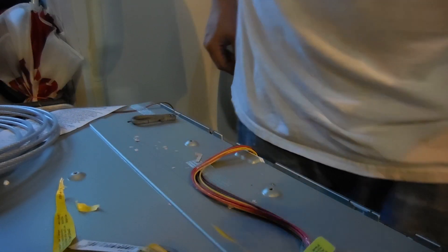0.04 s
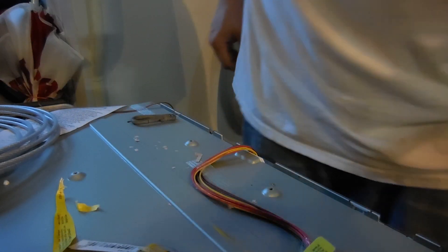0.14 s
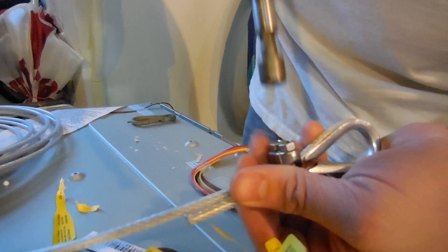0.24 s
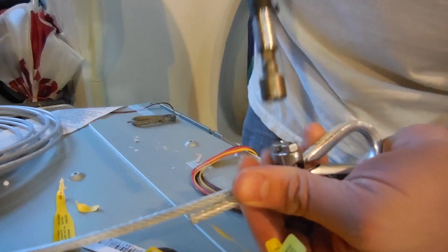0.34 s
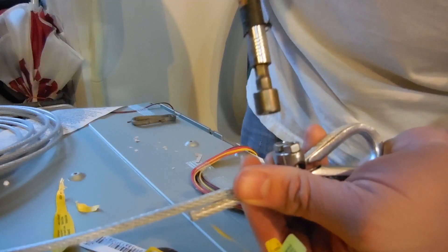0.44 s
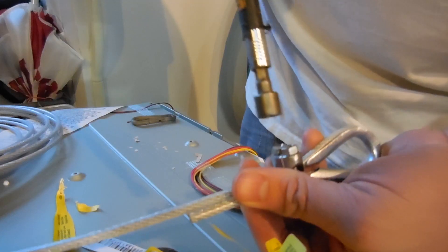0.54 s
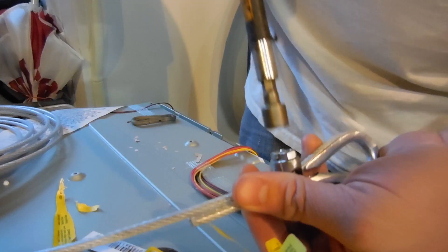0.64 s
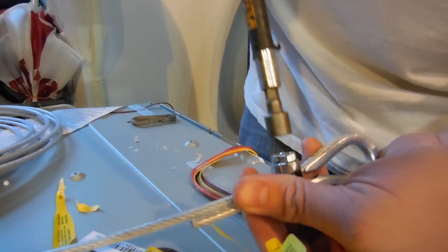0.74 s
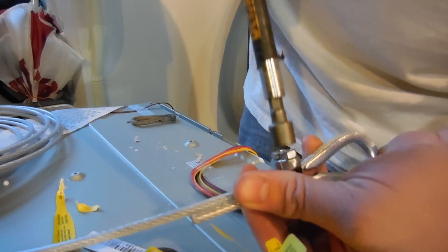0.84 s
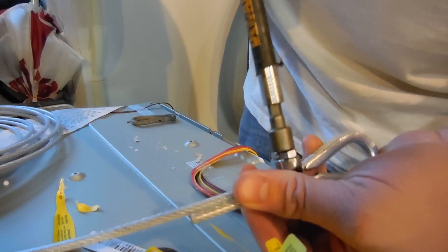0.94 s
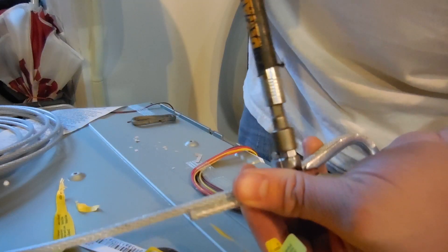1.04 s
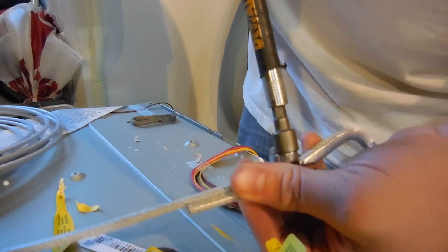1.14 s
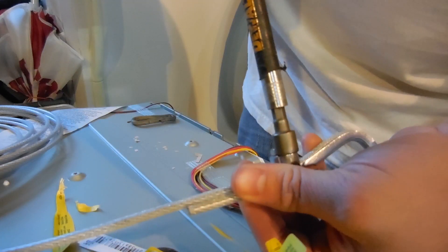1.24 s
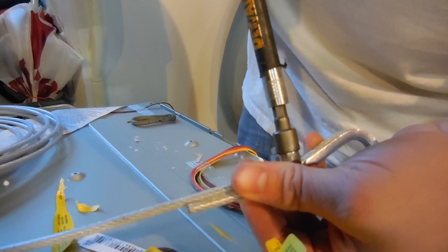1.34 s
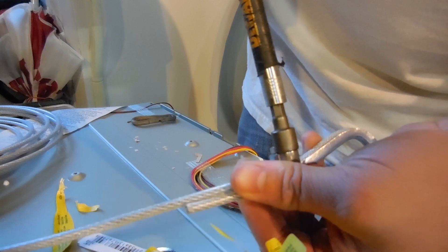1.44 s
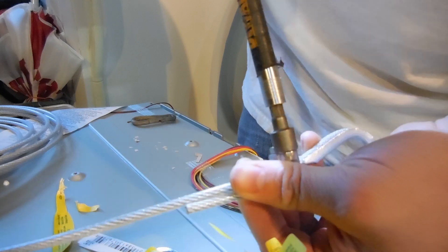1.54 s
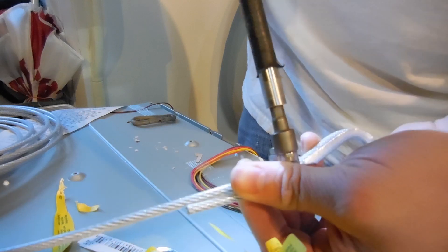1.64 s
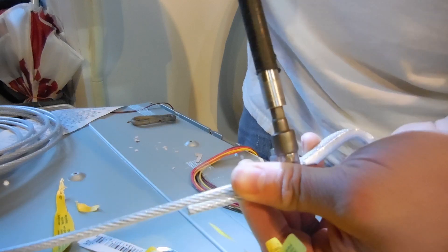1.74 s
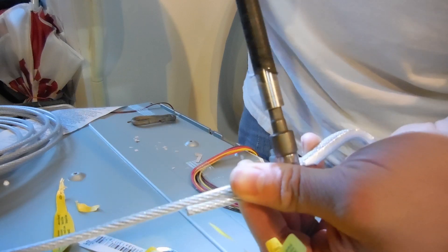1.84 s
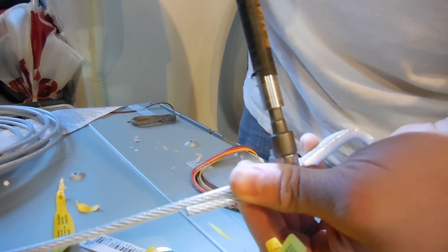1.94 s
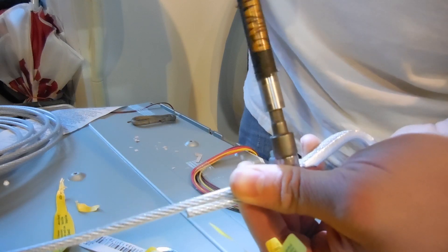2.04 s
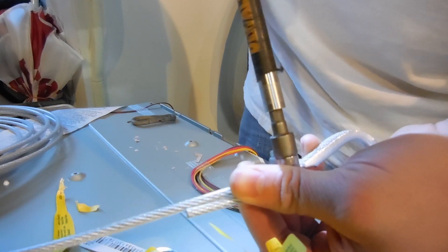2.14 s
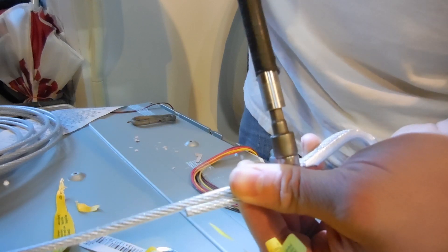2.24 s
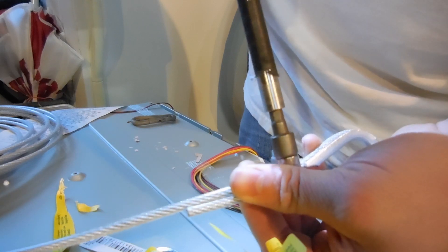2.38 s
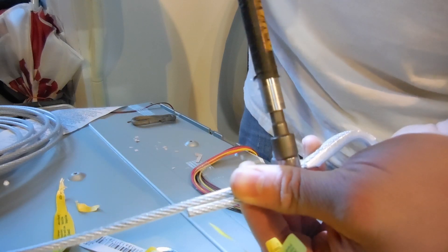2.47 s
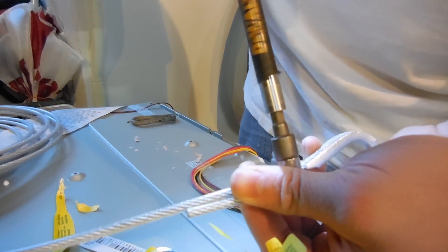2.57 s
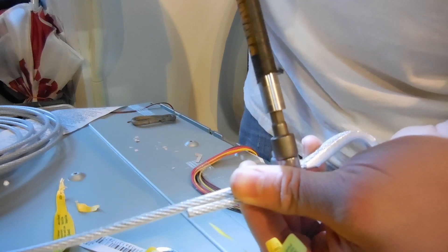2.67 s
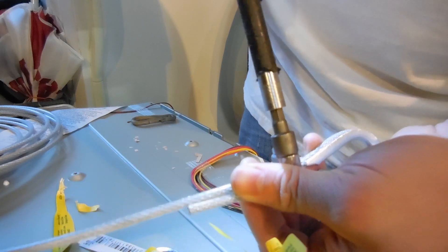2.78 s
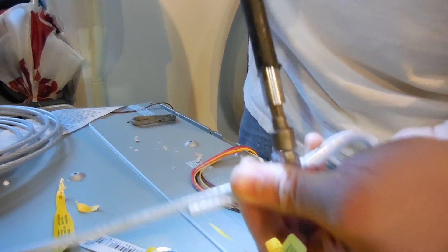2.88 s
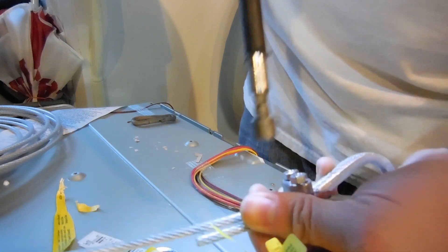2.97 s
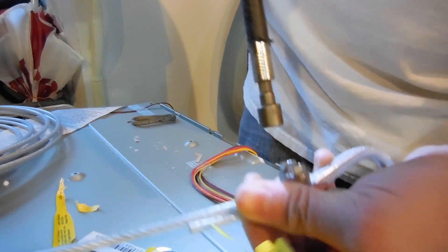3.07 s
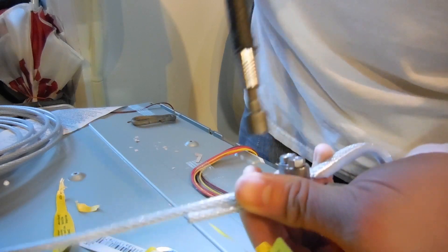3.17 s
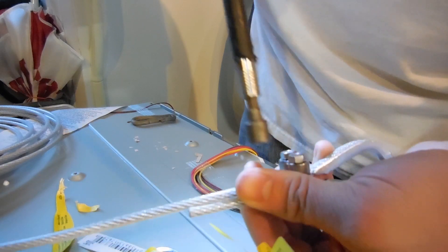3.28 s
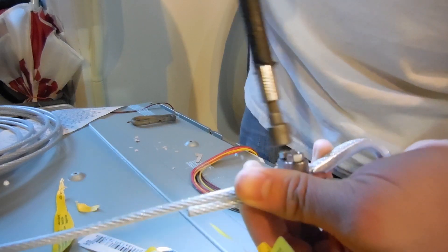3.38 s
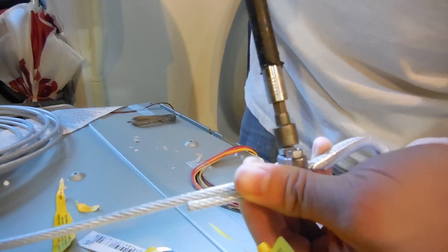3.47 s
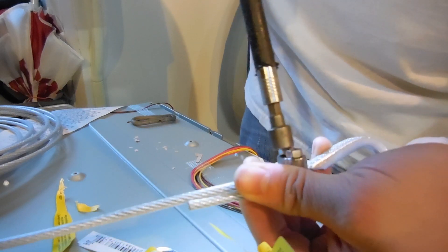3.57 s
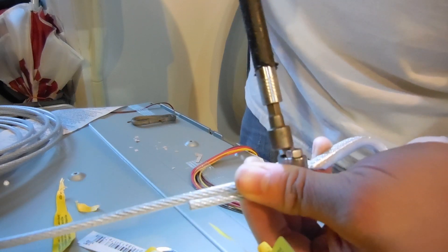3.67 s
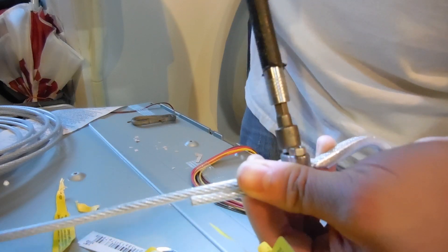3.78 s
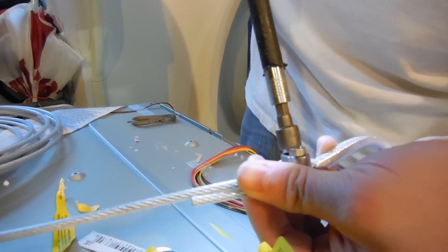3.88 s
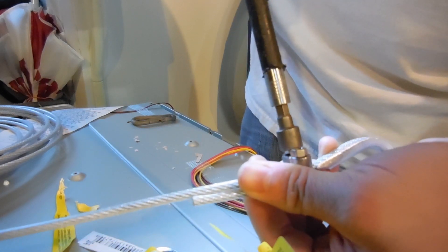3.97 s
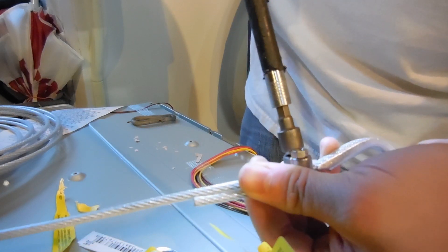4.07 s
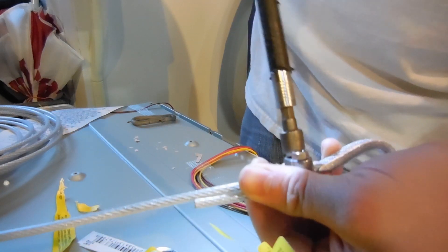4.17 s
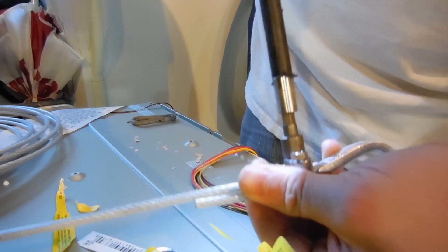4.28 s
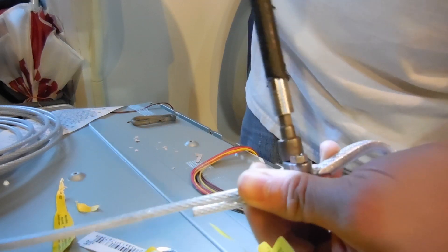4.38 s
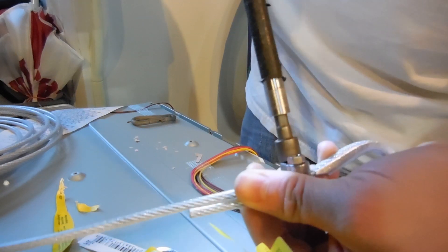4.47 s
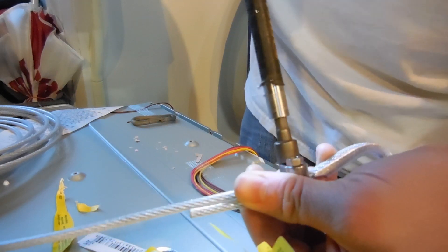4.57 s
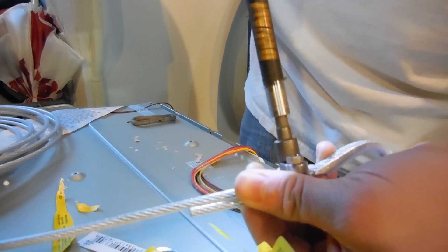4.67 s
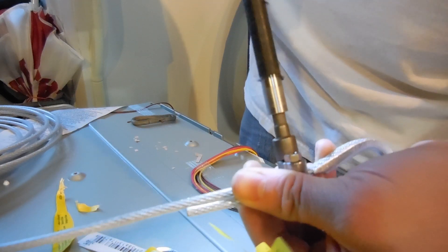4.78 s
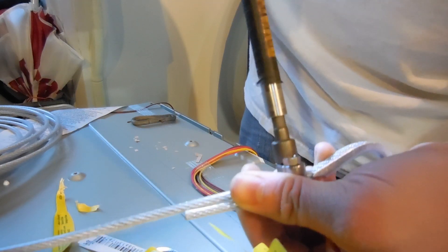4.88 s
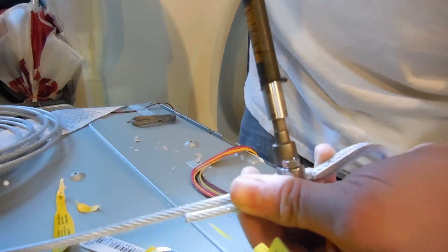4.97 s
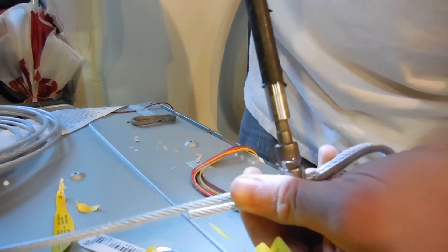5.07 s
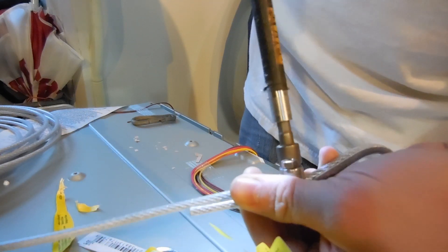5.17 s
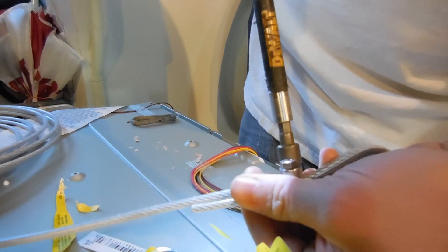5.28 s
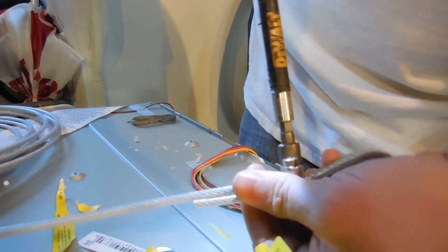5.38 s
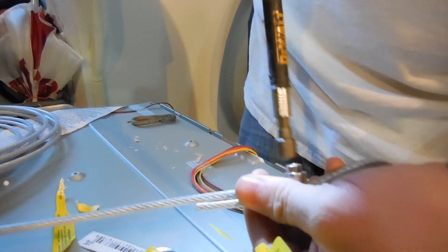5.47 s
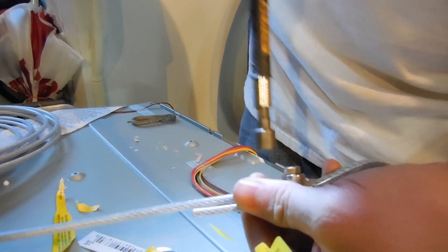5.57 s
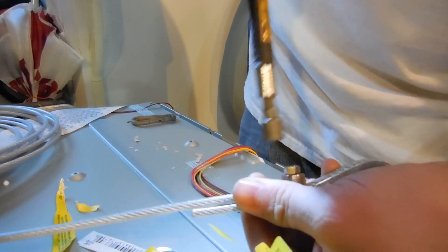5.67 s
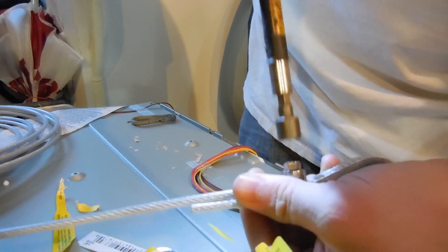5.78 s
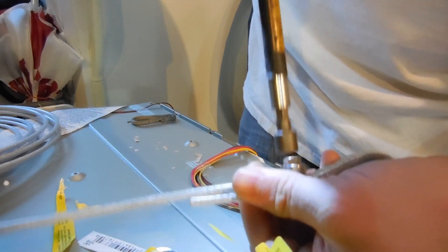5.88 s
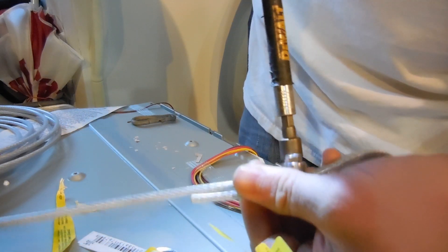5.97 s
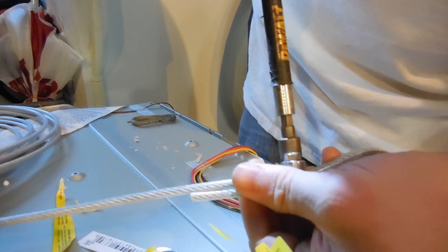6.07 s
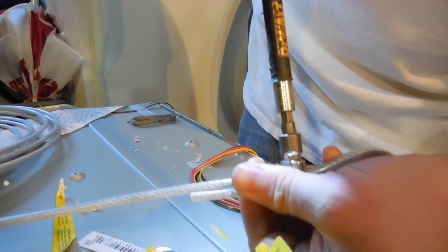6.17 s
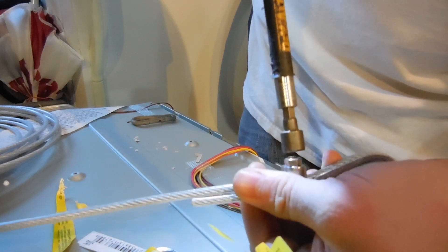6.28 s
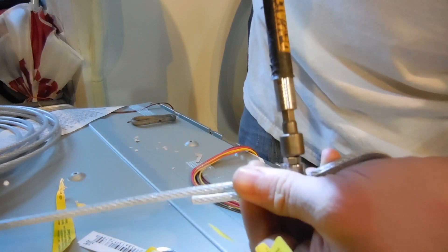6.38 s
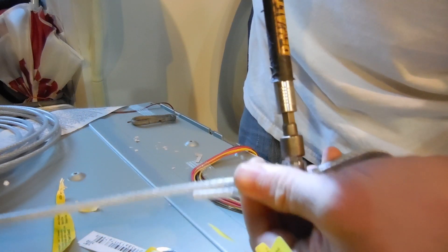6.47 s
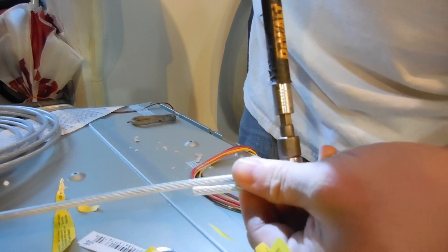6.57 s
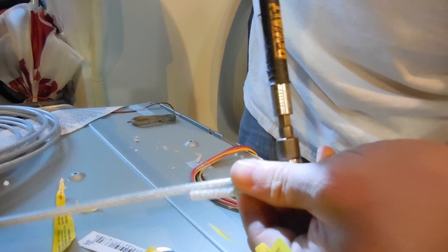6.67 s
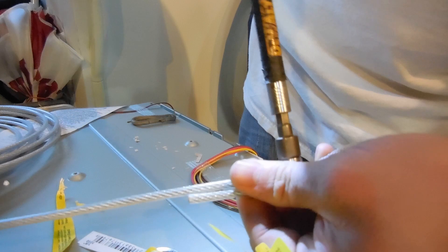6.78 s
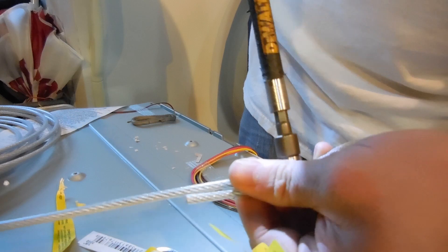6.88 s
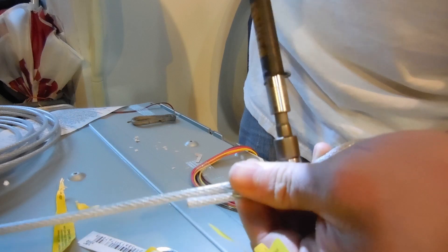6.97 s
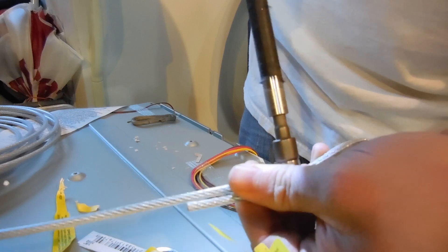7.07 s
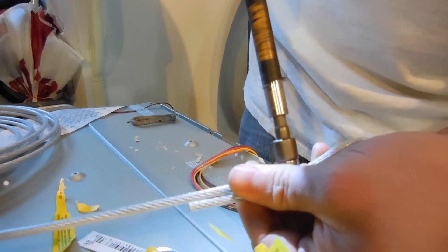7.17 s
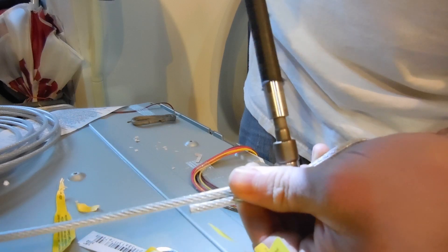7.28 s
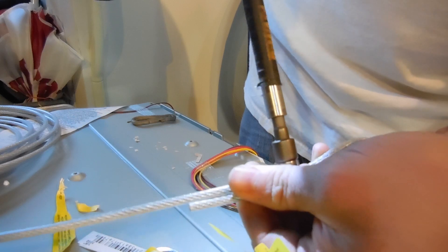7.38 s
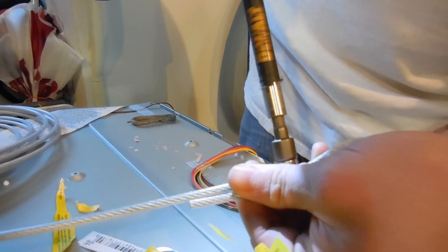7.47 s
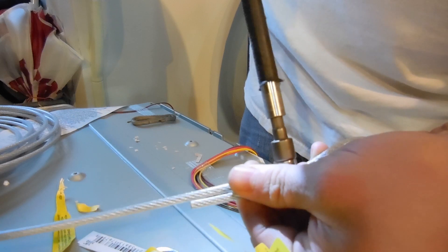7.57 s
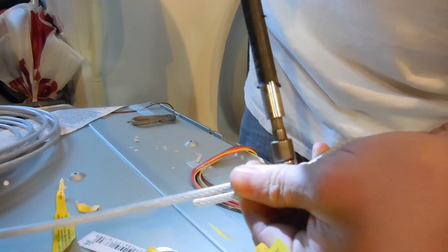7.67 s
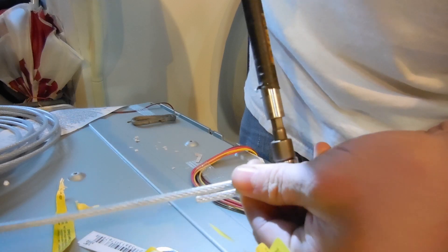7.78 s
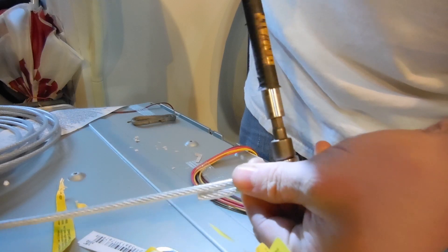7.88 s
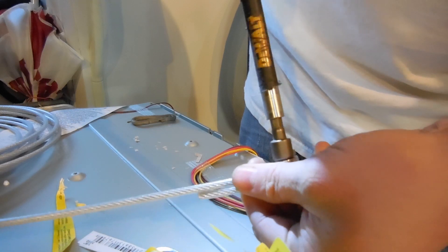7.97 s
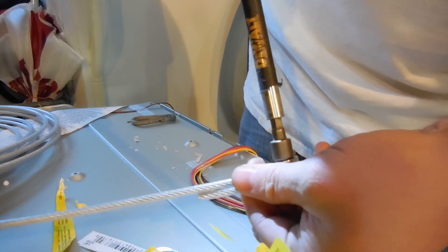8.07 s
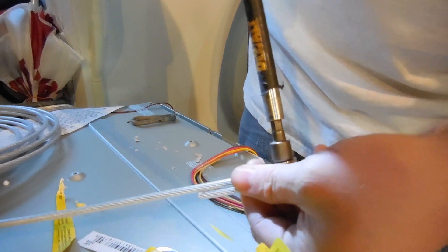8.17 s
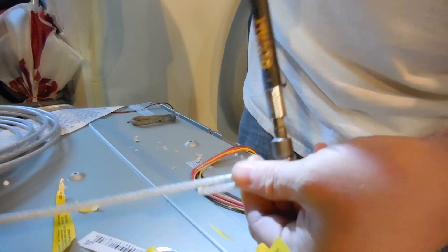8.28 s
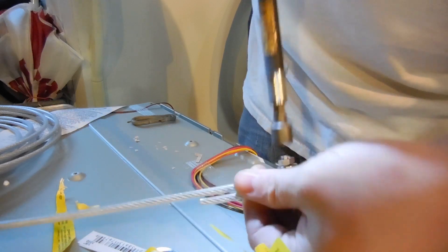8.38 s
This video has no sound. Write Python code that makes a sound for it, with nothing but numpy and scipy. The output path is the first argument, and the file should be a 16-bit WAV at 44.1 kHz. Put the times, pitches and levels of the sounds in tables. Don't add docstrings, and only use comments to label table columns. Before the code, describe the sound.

In a small, short-sounding workshop, a drill is heard about an arm's length from a stereo camera microphone. After faint hiss and hum, the steel socket ticks onto a nut, then the motor swells into a slow steady whine with a thin high whistle. More clicks and scrapes lead to a harder, abruptly ended burst, then another scatter of ticks and the fastest burst, which runs down gradually before final knocks.

```python
import sys
import numpy as np
from scipy import signal
from scipy.fft import rfft, irfft, next_fast_len
from scipy.io import wavfile
from scipy.ndimage import uniform_filter1d

SR = 44100
rng = np.random.default_rng(int(sys.argv[2]) if len(sys.argv) > 2 else 0)


def voltage_ratio(decibels):
    exponent = np.asarray(decibels, float) / 20
    return 10 ** exponent


def wav_out(sig):
    wavfile.write(sys.argv[1], SR, np.round(np.clip(np.atleast_2d(sig).T, -1, 1) * 32767).astype(np.int16))


N = 371763
OPPOSITE = np.array([[1], [-1]])


def unit(x):
    return x / np.sqrt(np.mean(x ** 2))


def pan(db):
    return voltage_ratio(db * OPPOSITE / 2)


def colour(x, points, peaks=()):
    size = next_fast_len(x.shape[-1])
    hz = np.maximum(np.arange(size // 2 + 1) * SR / size, 1)
    point_hz, point_db = np.array(points)[:, 0], np.array(points)[:, 1]
    db = np.interp(np.log(hz), np.log(point_hz), point_db)
    db = db + sum(top / (1 + (2 * (hz - f) / w) ** 2) for f, w, top in peaks)
    return irfft(rfft(x, size) * voltage_ratio(db), size)[..., :x.shape[-1]]


def resonate(x, hz, q):
    return signal.lfilter(*signal.iirpeak(hz, q, SR), x)


def walk(count, rate):
    knots = rng.standard_normal(int(count * rate / SR) + 2)
    return np.interp(np.arange(count) * rate / SR, np.arange(len(knots)), knots)


def spread(table):
    s, *columns = np.transpose(table)
    first = int(s[0] * SR)
    t = np.arange(first, min(int(s[-1] * SR), N)) / SR
    return first, t, [np.interp(t, s, c) for c in columns]


def glide(table, t):
    s, v = np.transpose(table)
    step = np.diff(v) / np.diff(s)
    a, b = np.r_[step[0], step], np.r_[step, step[-1]]
    slope = np.where(a * b > 0, 2 * a * b / (a + b + 1e-9), 0)
    k = np.clip(np.searchsorted(s, t) - 1, 0, len(s) - 2)
    h = s[k + 1] - s[k]
    u = np.clip((t - s[k]) / h, 0, 1)
    bend = (1 - u) * (slope[k] - step[k]) - u * (slope[k + 1] - step[k])
    return v[k] + h * u * (step[k] + (1 - u) * bend)


def background():
    # frequency in Hz, density in dB per Hz.
    hiss_curve = [(15, -48.5), (25, -27), (38, -17.5), (70, -7.5), (97, -4), (146, -21.5), (220, -9.5),
                  (349, -7.5), (706, -1), (4860, -7.5), (13600, -16), (15600, -24.5), (16500, -40)]
    # centre in Hz, width in Hz, level in dB.
    hum_bands = [(95, 30, -74.5), (130, 14, -81.5), (190, 14, -81.5), (223.8, 9.2, -72.5),
                 (300, 110, -74.5)]
    # time in seconds, frequency in Hz, level in dB.
    compressor = [(.33, 96.6, -68), (1.06, 96.75, -65), (3.2, 95, -65), (3.7, 92.8, -68), (5.8, 92.3, -70),
                  (6.4, 92.2, -68.5), (8.43, 96.2, -65)]
    hiss_db, bass_enters_s = -58.5, .325
    mid, side = colour(rng.standard_normal((2, N)), hiss_curve)
    out = voltage_ratio(hiss_db) * unit(mid + 0.9 * side * OPPOSITE)
    for hz, width, db in hum_bands:
        mid, side = resonate(rng.standard_normal((2, N)), hz, hz / width)
        out = out + voltage_ratio(db) * unit(mid + 0.37 * side * OPPOSITE)
    i, t, (hz, db) = spread(compressor)
    tone = np.sin(2 * np.pi * np.cumsum(hz) / SR)
    out[:, i:i + len(t)] += voltage_ratio(db + 0.5 + .8 * walk(len(t), rate=9)) * tone
    thin = colour(out, [(60, -20), (250, -5), (500, 0)])
    return np.where(np.arange(N) > bass_enters_s * SR, out, thin)


def scrapes():
    # start in seconds, length in seconds, level in dB,
    # share through the socket from 0 to 1.
    slides = [(0.987, 0.068, -54, 0.5), (1.088, 0.1, -54.5, 0.3), (1.276, 0.02, -51, 0.5),
              (3.556, 0.073, -48, 0.5), (3.781, 0.063, -38, .45), (4.297, 0.13, -47.5, 0.1),
              (5.521, 0.11, -55, 0.3), (5.975, 0.041, -45, 0.4), (6.028, 0.0374, -51, .8),
              (6.468, 0.074, -54.5, 0.3), (6.572, 0.046, -60, 0.4), (8.383, 0.018, -43, 0.4)]
    # frequency in Hz, density in dB per Hz.
    skin_curve = [(400, -15.5), (1500, 10.5), (4500, 9.5), (8000, -10.5), (12000, -7), (16000, -8)]
    steel_curve = [(2000, -27), (3000, 9.5), (14000, -0.5), (16000, -20)]
    steel_modes = [(4520, 1300, 5.7), (11900, 1200, 54)]
    slips = rng.standard_normal(N) * voltage_ratio(3.1 * walk(N, rate=480))
    skin = unit(colour(slips, skin_curve))
    steel = unit(colour(slips, steel_curve, steel_modes))
    out = np.zeros(N)
    for s, length, db, share in slides:
        i, count = int(s * SR), int(length * SR)
        mix = share * steel + (1 - share) * skin
        out[i:i + count] += voltage_ratio(db) * np.hanning(count) ** .5 * mix[i:i + count]
    return out


def crack(noise, hz, t):
    fall = np.exp(-t[:1024] / 0.0008) + 0.51 * np.exp(-t[:1024] / 0.0036)
    push = np.pad(noise * fall, (0, len(t) - 1024))
    broad = signal.lfilter(*signal.butter(2, [1000, 5500], "band", fs=SR), push)
    out = resonate(resonate(push, hz, 1.2), hz, 2.2) + voltage_ratio(-8) * broad
    return out / np.abs(out).max()


def socket_ring(noise, ring_db, length, t):
    # frequency in Hz, level in dB, decay by 60 dB in seconds.
    socket_modes = [(4204, -3, .17), (4710, 0, .13), (5650, -20, .04), (7400, -20, .04), (10400, -20, .04),
                    (11680, -9, .04), (12300, -6, .025)]
    short_mode_db = -10.5
    out = np.zeros(len(t))
    for k, (hz, db, t60) in enumerate(socket_modes):
        level_db = db + 4.5 * noise[k] + (ring_db if t60 > .1 else short_mode_db)
        out += voltage_ratio(level_db) * np.sin(2 * np.pi * hz * t) * 1000. ** (-t / t60 / length)
    return out


def ticks():
    # time in seconds, peak in dB, centre in Hz, ring in dB.
    firm = [(0.9935, -29.5, 3360, -22.5), (1.1765, -27, 6320, -22), (1.1892, -10, 11900, -20.5),
            (1.3767, -25.5, 1546, -44), (1.4186, -26, 2820, -37), (2.9288, -22.5, 5190, -38),
            (3.5232, -24.5, 4630, -31.5), (3.5722, -22.5, 5250, -21.5), (3.787, -24.5, 5810, -20.5),
            (3.7968, -23.5, 5244, -17.5), (3.806, -17.5, 12200, -24), (3.8174, -22.5, 4590, -19.5),
            (3.8382, -23.5, 4670, -31), (4.241, -25, 2940, -29), (4.2765, -6.5, 8900, -26),
            (5.4739, -29, 1267, -29), (5.9422, -18.5, 3590, -26), (5.95, -23.5, 3340, -28.5),
            (6.0328, -20, 4630, -17), (6.2525, -21, 9070, -33), (6.4122, -19, 11900, -15.5),
            (6.476, -16, 4500, -26.5), (6.5571, -12, 4940, -20.5), (6.808, -21.5, 2843, -39.5),
            (8.3683, -15, 4180, -38), (8.3873, -27.5, 3700, -29)]
    # time in seconds, peak in dB, centre in Hz.
    light = [(1.1097, -39, 4180), (1.1331, -40.5, 4650), (1.1458, -36.5, 11920), (1.2802, -36.5, 11900),
             (1.514, -33.5, 7650), (3.598, -35, 11980), (3.6114, -41, 11900), (3.862, -45, 2420),
             (5.9922, -39, 12100), (6.0467, -32.5, 4140), (6.5245, -46.5, 4200), (6.662, -43.5, 1560),
             (6.693, -42, 2180), (6.8272, -41.5, 2700), (6.8516, -33.5, 7810), (8.2412, -38, 5170)]
    light_ring_db, pan_db = -20.5, -3
    thud_hz, thud_s, thud_db = 986, 0.0034, -40
    out, t = np.zeros(N + 8192), np.arange(8192) / SR
    knocks = firm + [(*row, light_ring_db) for row in light]
    for s, db, hz, ring_db in knocks:
        noise = rng.standard_normal(1024)
        on_cable_db = 29 * (hz < 1800)
        length = .45 if hz > 8000 else .75
        thud = np.sin(2 * np.pi * thud_hz * voltage_ratio(noise[1]) * t) * np.exp(-t / thud_s)
        knock = crack(noise, hz, t) + voltage_ratio(thud_db + on_cable_db) * thud
        knock = knock + socket_ring(noise, ring_db, length, t)
        i = int(s * SR)
        out[i:i + len(t)] += voltage_ratio(db) * knock
    return out[:N] * pan(pan_db)


def chopper(slot_phase):
    # time in seconds, level in dB.
    whistles = [
        [(1.474, -70), (1.479, -44), (1.6, -39), (1.75, -32), (2.1, -30), (2.6, -33), (2.75, -50)],
        [(4.28, -70), (4.285, -42), (4.35, -46), (4.48, -44), (4.55, -60)],
        [(6.84, -70), (6.845, -42), (6.89, -39), (6.94, -38), (7.0, -60)],
    ]
    whistle_hz = 7885.5
    out = np.zeros(N)
    for table in whistles:
        i, t, (db,) = spread(table)
        part = slice(i, i + len(t))
        phase = 2 * np.pi * whistle_hz * t
        octave = voltage_ratio(-10.0) * np.exp(-((t - t[0]) / .2) ** 2) * np.sin(2 * phase)
        beat = 1 + .4 * np.sin(slot_phase[part])
        out[part] += voltage_ratio(db + 0.98 * walk(len(t), rate=88)) * (np.sin(phase) + octave) * beat
    return out


def fan_rumble(mid, side):
    # frequency in Hz, density in dB per Hz.
    fan_curve = [(15, -54), (25, -31.5), (113, -21), (212, -7), (363, -6), (483, -0.5), (593, -3),
                 (1100, -1), (1430, -36), (2420, -120)]
    return unit(colour(mid + 0.54 * side * OPPOSITE, fan_curve))


def brush_hiss(noise, grain):
    curve = [(7000, -33.5), (9000, -5.5), (12000, 6.0), (14000, -2.5), (14500, -51.5), (17000, -52.5)]
    return unit(colour(noise * grain, curve))


def whine(shaft_hz, turn, strong, turn_db, sink_db):
    # frequency in Hz, level in dB.
    shell = [(500, -51), (1000, -26.5), (3000, -13), (8000, -1.5), (13500, -6), (15500, -12.5),
             (16600, -33), (17000, -76)]
    # frequency in Hz, width in Hz, level in dB.
    shell_modes = [(1243, 443, 12), (2170, 326, 13), (2950, 900, 7.5), (3900, 160, 9), (4820, 200, 5),
                   (5920, 800, 4), (7100, 600, 0), (9880, 350, 0.5), (11400, 340, 2.5)]
    spread_db, waver_db, block = 2.5, 2.6, 32
    out, chance = np.zeros(len(turn)), rng.standard_normal(126)
    slow_db = sink_db * np.log2(shaft_hz[::block] / shaft_hz.max())
    for k in range(8, len(chance)):
        db = strong.get(k, turn_db + spread_db * chance[k])
        db = db + waver_db * walk(len(slow_db), rate=14 * block)
        db = db + slow_db * (k in strong) * min(k / 30, 1)
        level = np.repeat(voltage_ratio(db), block)[:len(turn)]
        out += level * (k * shaft_hz < .45 * SR) * np.sin(k * turn + k * k)
    return colour(out, shell, shell_modes)


def rotor_hum(slot_hz, turn):
    near_stall = np.exp(-(slot_hz / 560 - 1) ** 2 / 0.044) * (np.gradient(slot_hz) < 0)
    cog = voltage_ratio(-22.5) * near_stall * np.sin(10 * turn)
    wobble = voltage_ratio(-31) * (slot_hz / 2500) ** 2 * np.sin(2 * turn)
    return voltage_ratio(1.4 * walk(len(turn), rate=13)) * (cog + wobble)


def drill():
    # time in seconds, slot rate in Hz (ten a turn).
    speeds = [
        [(1.48, 101.3), (1.618, 562.5), (1.748, 881.2), (1.978, 1109), (2.242, 1212), (2.5, 1224), (2.65, 1192),
         (2.804, 961), (2.9, 514)],
        [(4.3, 249.2), (4.5, 875), (4.56, 1246), (4.64, 2025), (4.7, 2372), (4.76, 2439), (4.942, 2142),
         (5.268, 1585), (5.4, 349)],
        [(6.86, 147.6), (7.03, 2073), (7.1, 2508), (7.142, 2579), (7.226, 2429), (7.568, 1653), (7.9, 953),
         (8.134, 527), (8.23, 209.4)],
    ]
    # time in seconds, level in dB.
    efforts = [
        [(1.48, -61.5), (1.55, -44), (1.63, -27), (1.72, -24.5), (2.0, -21.5), (2.5, -20.5), (2.8, -22.5),
         (2.884, -56.5), (2.9, -59.5)],
        [(4.3, -54.5), (4.36, -37.5), (4.5, -30), (4.56, -20.5), (4.63, -14.5), (5.28, -15.5), (5.314, -23.5),
         (5.354, -49), (5.4, -49.5)],
        [(6.86, -47.5), (6.92, -24.5), (7.0, -14.5), (7.4, -15), (7.8, -16), (8.084, -21.5), (8.15, -27),
         (8.202, -46.5), (8.23, -57)],
    ]
    # fan in dB at 1 kHz slot rate, brushes in dB, whine in dB at
    # top speed, whine lost in dB per octave of speed, judder of the rotor under load in radians.
    mixes = [
        (-31, 0, -7, 1.5, .002),
        (-30, -4.5, -0.5, 3, 0.008),
        (-30.5, -14.5, -1.5, 3, .012),
    ]
    # multiple, level in dB.
    orders = [
        {10: 6.5, 15: 4, 19: -0.5, 20: -4, 30: -2, 31: -3.5, 40: -3.5, 41: -9, 45: -6.5, 50: 5, 59: -6, 67: -7, 80: -3, 90: -10, 91: -6.5, 100: -14},
        {10: 1, 15: -2, 20: -4.5, 30: -4.5, 40: -6, 50: -8.5, 60: -8, 70: -9.5, 80: -12},
        {10: 1.5, 15: -7.5, 20: -5, 30: -0.5, 40: -3.5, 50: -5.5, 60: -8, 70: -9, 80: -14.5},
    ]
    turn_dbs = (-14, -20, -20)
    # frequency in Hz, density in dB per Hz.
    housing = [(400, -45), (800, -25.5), (1100, -16.5), (1500, -7.5), (3000, -2.5), (5000, -4), (6000, -3),
               (7500, -3.5), (11000, -9.5), (13400, -5.5), (14100, -17.5), (16000, -26.5), (16800, -71.5)]
    # frequency in Hz, width in Hz, level in dB.
    resonances = [(1250, 420, 8.5), (2400, 400, -1), (3720, 200, 3), (5720, 1300, 7.5), (8520, 1100, 4)]
    out, slot_phase = np.zeros((2, N)), np.zeros(N)
    rub, air, spark, side = rng.standard_normal((4, N))
    grain = voltage_ratio(2.1 * walk(N, rate=900))
    scale = np.sqrt(np.mean(colour(rub, housing, resonances) ** 2))
    fan, brushes = fan_rumble(air, side), brush_hiss(spark, grain)
    for speed, effort, mix, strong, turn_db in zip(speeds, efforts, mixes, orders, turn_dbs):
        fan_db, brush_db, whine_db, sink_db, judder = mix
        i, t, (db,) = spread(effort)
        part, slot_hz = slice(i, i + len(t)), glide(speed, t)
        turn = 2 * np.pi * np.cumsum(slot_hz / 10) / SR + judder * walk(len(t), rate=150)
        slot_phase[part] = 10 * turn
        teeth = rub[part] + voltage_ratio(-11.5) * side[part] * OPPOSITE
        teeth = teeth * grain[part] * (1 + 0.22 * np.sin(10 * turn))
        body = colour(teeth, housing, resonances) / scale
        body += voltage_ratio(whine_db) * whine(slot_hz / 10, turn, strong, turn_db, sink_db) / scale
        body += rotor_hum(slot_hz, turn)
        fan_level = voltage_ratio(fan_db + 9 * np.log2(slot_hz / 1000))
        brush_level = voltage_ratio(brush_db - 9.5 + 6 * np.log2(slot_hz / slot_hz.max()))
        burst = voltage_ratio(-2.5) * body + fan_level * fan[:, part] + brush_level * brushes[part]
        fade = np.minimum(1, np.minimum(t - t[0], t[-1] - t) / .01)
        out[:, part] += fade * voltage_ratio(db) * burst
    return (out + chopper(slot_phase)) * pan(-1)


def scene():
    # frequency in Hz, level in dB.
    port_curve = [(60, -6), (110, -3.5), (200, -7), (380, -13), (700, -10.5), (1290, -15.5), (2380, -8.5),
                  (4400, -1), (8120, -2.5), (15000, 4.5)]
    bench_t60_s, bench_db = 0.021, -4
    room_t60_s, room_db, room_hz = 0.39, -19.5, 3415
    direct = drill() + scrapes() + ticks()
    t = np.arange(SR // 2) / SR
    bench = unit(rng.standard_normal(len(t)) * 1000. ** (-t / bench_t60_s)) / np.sqrt(len(t))
    room = signal.lfilter(*signal.butter(1, room_hz, fs=SR), rng.standard_normal((2, len(t))))
    room = room * 1000. ** (-t / room_t60_s) * (t > .005)
    room = voltage_ratio(room_db) * unit(room) / np.sqrt(len(t))
    scatter = signal.fftconvolve(direct.mean(axis=0), bench)[:N]
    scatter = voltage_ratio(bench_db) * colour(scatter, port_curve)
    tail = signal.fftconvolve(direct, room, axes=1)[:, :N]
    return direct + tail + scatter * OPPOSITE + background()


def low_pass(x):
    return signal.sosfilt(signal.butter(12, 16800, fs=SR, output="sos"), x)


def record(dry):
    # lower edge in Hz, upper edge in Hz.
    top_bands = [(13900, 14500), (14500, 15200), (15200, 17000)]
    shut_below = (-.9, .1, .6)
    knee, loud_db = .47, -42
    over = np.maximum(np.abs(dry) - knee, 0)
    x = dry - np.sign(dry) * (over - .25 * np.tanh(over / .25))
    loud = uniform_filter1d(np.abs(x[0]), size=4096) > voltage_ratio(loud_db)
    for (lo, hi), shut in zip(top_bands, shut_below):
        band = colour(x, [(lo - 1, -120), (lo, 0), (hi, 0), (hi + 1, -120)])
        closed = loud & (walk(N, rate=16) < shut)
        x = x - band * uniform_filter1d(1. * closed, size=512)
    return low_pass(x)


dry = scene()
out = record(dry)
wav_out(out)
```